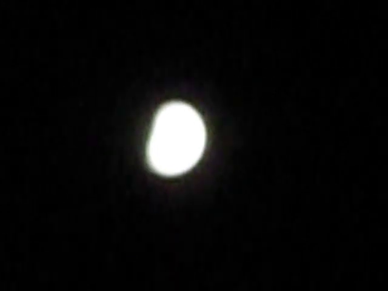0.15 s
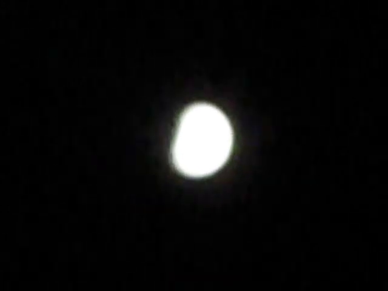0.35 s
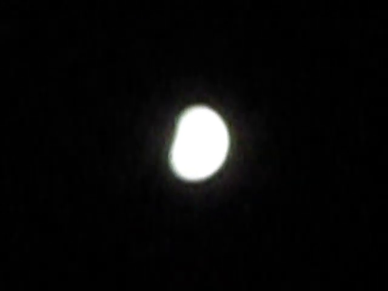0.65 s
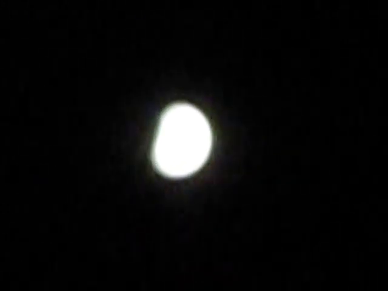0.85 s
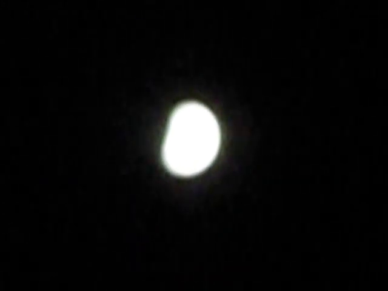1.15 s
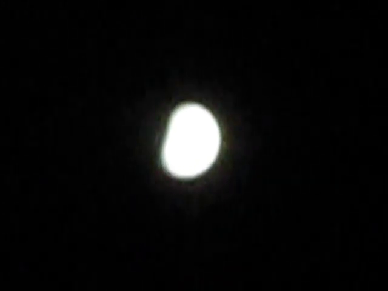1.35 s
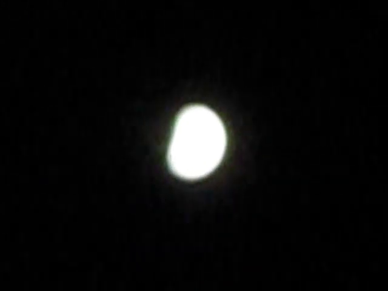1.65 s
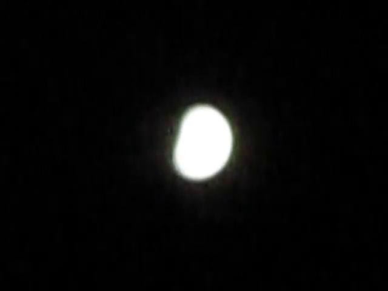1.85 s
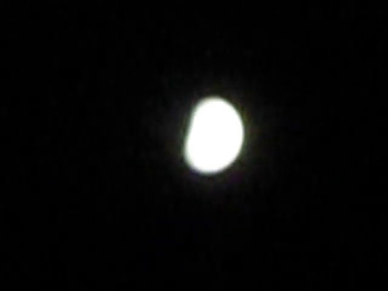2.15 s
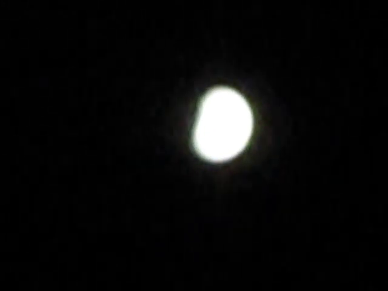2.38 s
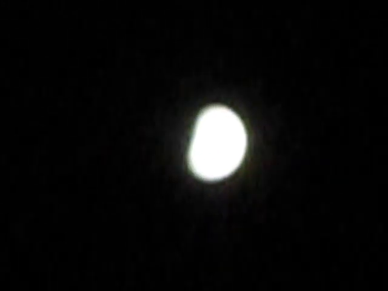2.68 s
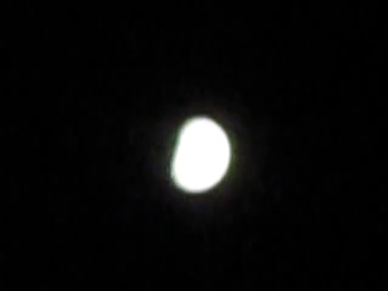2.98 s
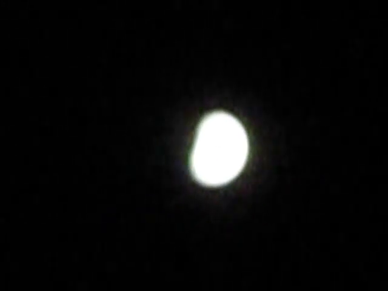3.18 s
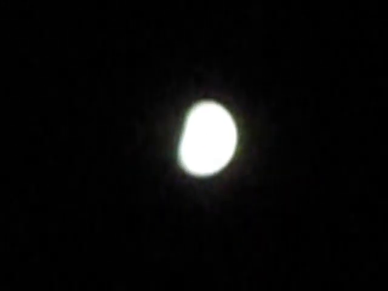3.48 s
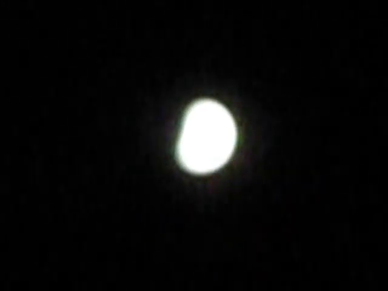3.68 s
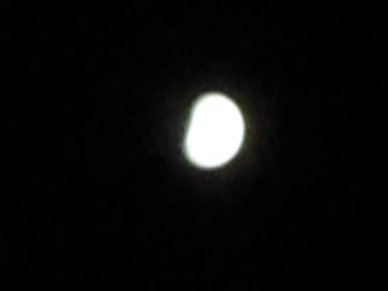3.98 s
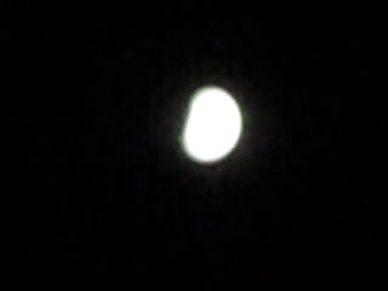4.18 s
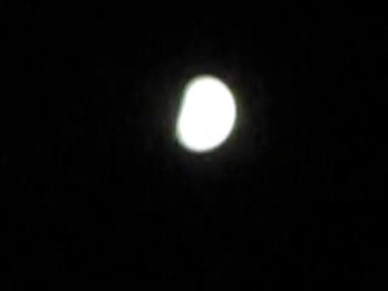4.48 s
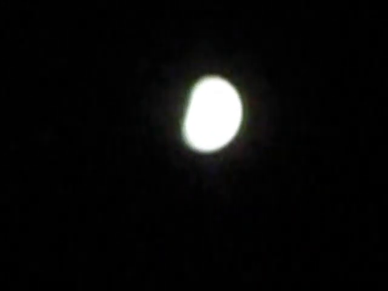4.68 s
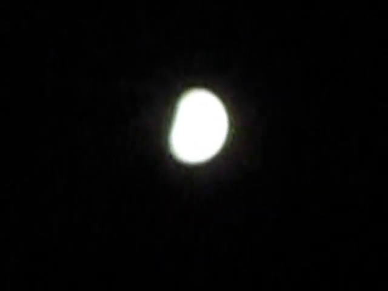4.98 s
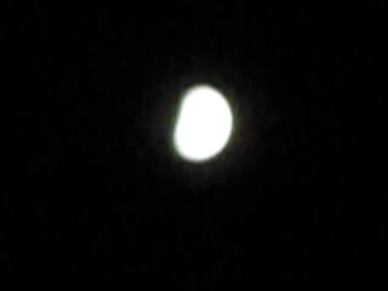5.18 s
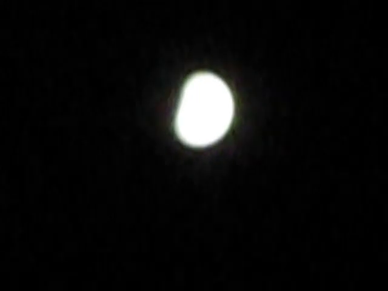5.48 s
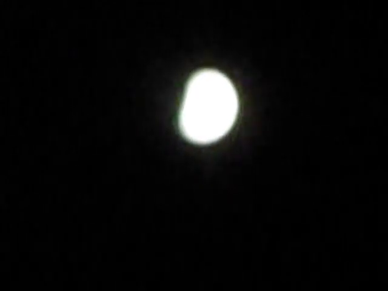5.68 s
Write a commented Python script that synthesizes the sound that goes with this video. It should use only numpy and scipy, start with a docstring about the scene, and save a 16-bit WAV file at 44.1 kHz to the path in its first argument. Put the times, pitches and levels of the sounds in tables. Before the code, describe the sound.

Night outdoors: the tail of one barn owl hiss, then three full, half-second rasping hisses about two seconds apart. Crickets chirp throughout in quick runs over a faint distant trill. Wind is light at first, then rumbles and thumps irregularly on a handheld camera's microphone. One small plastic click falls midway.

```python
"""Owls and crickets on a gusty night

Barn owls hiss about every two seconds: throat noise through resonances that brighten as the push goes on.
Crickets chirp in short runs of falling tones, with echoes, over a steady distant trill.
Gusts buffet the single microphone of a hand-held camera: flickering rumble, eddies and hard thumps.
The case ticks, scuffs and clicks once; traffic, a fading engine drone, hiss and a thin whine lie beneath."""
import sys
import numpy as np
from scipy import signal
from scipy.fft import rfft, irfft
from scipy.io import wavfile

SR = 44100
rng = np.random.default_rng(int(sys.argv[2]) if len(sys.argv) > 2 else 0)


def wrap_up_sound(samples):
    """Save the sound to the file named by the first command line argument, as 16-bit audio."""
    columns = np.atleast_2d(samples).T
    # keep every value between -1 and 1, then stretch to whole-number steps
    tamed = np.clip(columns, -1, 1)
    steps = np.round(tamed * 32767).astype(np.int16)
    wavfile.write(sys.argv[1], SR, steps)


N = 257103
TIME = np.arange(N) / SR
FREQ = np.maximum(np.arange(N // 2 + 1) * SR / N, 1)


def undb(db):
    """Decibels to gain."""
    return 10 ** (np.asarray(db) / 20)


def unit(x):
    """Scale to rms 1."""
    return x / np.sqrt(np.mean(x ** 2))


def colour(points):
    """Gain at every frequency from (Hz, dB) points, straight on a log-frequency axis."""
    hz, db = np.transpose(points)
    return undb(np.interp(np.log(FREQ), np.log(hz), db))


def shape(x, gain):
    """Filter by a gain at every frequency."""
    return irfft(rfft(x) * gain, N)


def noise(gain):
    """Noise of rms 1 with the given spectrum."""
    return unit(shape(rng.standard_normal(N), gain))


def resonance(hz, width_hz):
    """Gain of a resonance applied twice: steep skirts."""
    detune = (FREQ ** 2 - hz ** 2) / (FREQ * width_hz * np.sqrt(2))
    return 1 / (1 + detune ** 2)


def walk(rate_hz):
    """Slow random drift of rms 1."""
    return noise(1 / (1 + (FREQ / rate_hz) ** 4))


def level(points):
    """Level in dB at every moment from (s, dB) points."""
    return np.interp(TIME, *np.transpose(points))


def add(out, start_s, sound):
    """Mix a short sound in at its time."""
    i = max(int(start_s * SR), 0)
    out[i:i + len(sound)] += sound[:N - i]


def scatter(x, t60_s):
    """The fading echo that ground, trees and walls return."""
    t = TIME[:SR // 2]
    after_gap = t > 0.004
    tail = rng.standard_normal(len(t)) * undb(-60 * t / t60_s) * after_gap
    return signal.fftconvolve(x, tail / np.linalg.norm(tail))[:N]


HISS_ATTACK_S, HISS_SWELL_S = 0.017, 0.12
HISS_RELEASE_DB_PER_S, BRIGHTEN_DB_PER_S = 115, 10


def hiss(start_s, length_s, level_db, swell_db, treble_db, throat, rasp_db=-0.06, low_hz=2200,
         edge_hz=4000, closed_db=-30, first_hz=3000, open_s=0.05):
    """Air forced through the throat; as the push goes on it wakes the upper resonances."""
    age = np.maximum(TIME - start_s, 0)
    swell = swell_db * np.exp(-age / HISS_SWELL_S)
    release = HISS_RELEASE_DB_PER_S * np.maximum(age - length_s, 0)
    effort_db = level_db - swell - release
    edge_db = treble_db - BRIGHTEN_DB_PER_S * np.maximum(length_s - age, 0)
    low_cut = 1 / np.sqrt(1 + (low_hz / FREQ) ** 24)
    air = 0
    for hz, width_hz, mode_db in throat:
        # upper resonances take more of the brightening
        share = np.clip(np.log2(hz / edge_hz) + 0.22, 0, 1)
        # the beak opens during the first moments, and the lowest resonance comes in with it
        shut_db = closed_db * max(np.log2(first_hz / hz), 0) * np.exp(-age / open_s)
        mode = noise(resonance(hz, width_hz) * low_cut) * np.sqrt(width_hz / 800)
        air = air + mode * undb(mode_db + share * edge_db + shut_db)
    attack = np.minimum(age / HISS_ATTACK_S, 1)
    return air * attack * undb(effort_db + rasp_db * walk(90))


# Throat and beak resonances, one table per posture.
# Each row: centre in Hz, width in Hz, level in dB at a width of 800 Hz.
THROATS = {
    "A": [(2380, 370, -3.5), (2840, 450, -1), (3300, 420, -5.5), (3730, 370, -1.5), (4040, 260, -23),
          (4830, 500, -5.5), (6300, 700, -10.5), (7200, 1500, -5), (9200, 1600, -12)],
    "B": [(2404, 380, 0), (2886, 350, 0.5), (3280, 180, -17), (3560, 400, -2.5), (3970, 390, -4.5),
          (4830, 310, -6), (6770, 1400, -9.5), (7400, 1200, -9.5), (9750, 1400, -19)],
    "C": [(2370, 380, -1), (2940, 280, 1.5), (3340, 280, -15), (3640, 290, 1), (4010, 370, -2),
          (4800, 820, -14), (6400, 940, -11), (7150, 1000, -5), (9500, 2000, -19.5)],
}
# Owl hisses. Each row: start in seconds, length of the push in seconds, level at full effort in dB,
# swell in dB, treble at the end of the push in dB, throat posture (a letter).
OWL_HISSES = [(-0.48, 0.49, -43.5, 10, -0.5, "B"), (0.945, 0.51, -40, 9, -6.5, "A"),
              (2.895, 0.52, -43, 9.5, 1, "B"), (4.65, 0.52, -43.5, 10.5, -1.5, "C")]


def owls(echo_db=-12):
    """The end of one hiss and three whole ones, with the echo of their surroundings."""
    calls = sum(hiss(*row, THROATS[posture]) for *row, posture in OWL_HISSES)
    return calls + undb(echo_db) * scatter(calls, t60_s=0.23)


# Night air and microphone hiss. Each row: frequency in Hz, relative density in dB per Hz.
NIGHT_COLOUR = [(20, 3.5), (100, 0.5), (250, -3.5), (480, -2.5), (800, 2.5), (1100, -2), (1700, -9.5),
                (3300, -12), (5000, -14.5), (7000, -18), (9500, -19), (12500, -21), (15500, -28.5)]
# Fading far engine. Each row: time in seconds, level in dB.
DRONE_LEVEL = [(0, -55), (.7, -55.5), (1.0, -72), (1.5, -90)]
# Its resonances. Each row: centre in Hz, width in Hz, relative gain in dB.
DRONE_RESONANCES = [(220, 38, -2), (270, 40, -5), (424, 20, 0)]
WHINE_HZ = 15734


def background(air_db=-47.5, whine_db=-83):
    """Far traffic, a fading engine drone, microphone hiss and the camera's thin electronic whine."""
    air = noise(colour(NIGHT_COLOUR)) * undb(air_db + 0.38 * walk(7.3))
    bands = sum(undb(db) * resonance(hz, width_hz) for hz, width_hz, db in DRONE_RESONANCES)
    drone = noise(bands) * undb(level(DRONE_LEVEL))
    whine = np.sqrt(2) * np.sin(2 * np.pi * WHINE_HZ * TIME)
    return air + drone + undb(whine_db) * whine


def eddy(centre_s, db, hz, cycles):
    """One eddy briefly pushes the diaphragm to and fro; gives its start and its sound."""
    t = np.arange(-SR // 25, SR // 25) / SR
    push = np.cos(2 * np.pi * (hz * t + rng.random())) / np.cosh(t * hz / cycles)
    return centre_s + t[0], undb(db) * push


# Low rumble. Each row: time in seconds, level in dB before the flutter.
RUMBLE_LEVEL = [(0.0, -49), (0.1, -61.5), (1.23, -57.5), (1.38, -75), (1.59, -42.5), (2.6, -50.5),
                (2.74, -36), (2.79, -53), (3.99, -41.5), (4.12, -54), (4.61, -45), (5.21, -53),
                (5.29, -43.5), (5.83, -51)]
# Its spectrum. Each row: frequency in Hz, relative gain in dB.
RUMBLE_COLOUR = [(6, -37), (20, -12), (32, 0), (55, 1.5), (110, -1), (180, -17), (280, -16), (420, -25.5),
                 (800, -32), (2000, -95)]
# Hardest eddies, heard as single thumps.
# Each row: centre in seconds, envelope peak in dB before thump_trim_db and the capsule leak, pitch in Hz.
THUMPS = [(1.625, -20.5, 200), (1.782, -16, 190), (1.853, -20, 260), (1.933, -17.5, 195), (1.996, -19, 274),
          (2.104, -17.5, 165), (2.175, -15.5, 176), (2.709, -13, 110), (2.724, -13, 183),
          (3.445, -17.5, 230), (3.943, -17, 225), (4.011, -12, 148), (5.327, -18, 173), (5.348, -17.5, 200),
          (5.42, -22, 201), (5.539, -17, 145)]
# Gusts, each a string of random eddies.
# Each row: start in seconds, length in seconds, mean eddy peak in dB before the capsule leak.
GUST_EDDIES = [(1.516, 0.1, -25.5), (1.73, 0.31, -28), (2.12, 0.09, -25.5), (2.335, 0.04, -28.5),
               (2.461, 0.09, -35.5), (2.681, 0.07, -23.5), (2.945, 0.025, -30), (3.144, 0.07, -32),
               (3.295, 0.025, -31.5), (3.413, 0.025, -23), (3.509, 0.025, -29.5), (3.575, 0.14, -25),
               (3.865, 0.12, -29.5), (4.31, 0.025, -30), (4.498, 0.025, -28), (4.618, 0.09, -29.5),
               (5.08, 0.05, -32.5), (5.315, 0.115, -23), (5.535, 0.035, -29)]
EDDIES_PER_S, EDDY_HZ, EDDY_SCATTER_DB, EDDY_SCATTER_OCTAVES = 65, 125, 2, 0.42


def wind(thump_trim_db=-1.5, flutter_db=4.0, thump_cycles=0.31, eddy_cycles=0.37,
         jitter=0.3, leak_hz=40, swirl_db=-18, swirl_hz=230, swirl_width_hz=130):
    """A fluttering rumble, gusts that break into eddies, and a few hard thumps."""
    rumble = noise(colour(RUMBLE_COLOUR)) * undb(level(RUMBLE_LEVEL) + flutter_db * walk(30))
    eddies = np.zeros(N)
    for centre_s, db, hz in THUMPS:
        add(eddies, *eddy(centre_s, db + thump_trim_db, hz, thump_cycles))
    for start_s, length_s, db in GUST_EDDIES:
        for slot_s in np.arange(start_s, start_s + length_s, 1 / EDDIES_PER_S):
            late, force, size = rng.standard_normal(3)
            centre_s = slot_s + jitter * late / EDDIES_PER_S
            hz = EDDY_HZ * 2 ** (EDDY_SCATTER_OCTAVES * size)
            add(eddies, *eddy(centre_s, db + EDDY_SCATTER_DB * force, hz, eddy_cycles))
    # each eddy sheds smaller, faster swirls
    swirls = undb(swirl_db) * eddies * noise(resonance(swirl_hz, swirl_width_hz))
    # the capsule leaks, so it cannot hold a steady push
    return rumble + shape(eddies + swirls, FREQ / (FREQ + leak_hz))


def wing_stroke(hz, length_s, fall_hz=350, bend=2.8, swell=2.55):
    """A tone that swells while its pitch falls, as the scraper slows along the file."""
    t = TIME[:int(length_s * SR)]
    pitch_hz = hz - fall_hz * (t / 0.0191) ** bend  # down by fall_hz at 19.1 ms
    envelope = np.sqrt(np.sin(np.pi * (t / length_s) ** swell).clip(0))
    return envelope * np.sin(2 * np.pi * np.cumsum(pitch_hz) / SR), pitch_hz


GAP_GROWTH_S = 0.005
# shortfall of the first stroke: level, share of pitch, share of length; then the share left at each next one
COLD_DB, COLD_FLAT, COLD_SHORT, COLD_LEFT = -3, 0.031, 0.25, 0.45


def chirp(closure_s, db, hz, gap_s, length_s, count):
    """Strokes as (s, dB, Hz, length s): they slow down and grow louder, higher and longer."""
    for k in range(count):
        cold = COLD_LEFT ** k
        lasts_s = length_s * (1 - COLD_SHORT * cold)
        yield closure_s - lasts_s, db + COLD_DB * cold, hz * (1 - COLD_FLAT * cold), lasts_s
        closure_s = closure_s + gap_s + k * GAP_GROWTH_S


# Cricket chirps. Each row: first wing closure in seconds, strokes (count), level in dB before trim_db,
# starting pitch in Hz and (sixth) stroke length in seconds that the strokes approach,
# with the first gap between closures in seconds fifth; last, echo in dB before echo_db.
CRICKET_CHIRPS = [(0.253, 4, -37, 4300, 0.043, 0.024, -5.5), (0.446, 3, -46.5, 4340, 0.044, 0.018, -8),
                  (0.712, 5, -38, 4253, 0.0445, 0.024, 0), (1.308, 4, -40.5, 4240, 0.042, 0.028, 7),
                  (1.509, 4, -40, 4130, 0.036, 0.019, 1), (1.739, 4, -41.5, 4240, 0.042, 0.026, 4.5),
                  (2.068, 3, -45, 4380, 0.041, 0.02, -10), (2.218, 4, -42, 4300, 0.044, 0.026, 3.5),
                  (2.682, 5, -42, 3890, 0.045, 0.013, -6), (2.751, 4, -41.5, 4300, 0.043, 0.025, 4),
                  (3.202, 4, -42, 4320, 0.043, 0.026, 4), (3.491, 3, -46.5, 4380, 0.038, 0.021, -5),
                  (3.644, 4, -39.5, 4270, 0.046, 0.026, 1.5), (4.103, 5, -42, 3870, 0.042, 0.012, -6),
                  (4.221, 3, -47, 4370, 0.04, 0.024, -8), (4.512, 4, -41, 4310, 0.045, 0.026, 2.5),
                  (5.028, 3, -35.5, 4255, 0.049, 0.022, 0), (5.425, 4, -40.5, 4334, 0.044, 0.027, 4),
                  (5.479, 4, -39.5, 3880, 0.047, 0.013, -6), (5.62, 3, -49, 4370, 0.039, 0.022, -7)]


def crickets(trim_db=-1, echo_db=1, echo_hz=4210, echo_width_hz=130, chorus_db=-62, uneven_db=0.2):
    """Near crickets chirp by chirp, their echoes, and the steady trill of distant ones."""
    near, outward = np.zeros(N), np.zeros(N)
    for first_s, count, chirp_db, chirp_hz, gap_s, stroke_s, share_db in CRICKET_CHIRPS:
        for start_s, db, hz, length_s in chirp(first_s, chirp_db, chirp_hz, gap_s, stroke_s, count):
            stroke, pitch_hz = wing_stroke(hz, length_s)
            near_db = db + trim_db + uneven_db * rng.standard_normal()
            add(near, start_s, undb(near_db) * stroke)
            # the surroundings return mostly the pitches near echo_hz
            returned = stroke / (1 + ((pitch_hz - echo_hz) / echo_width_hz) ** 2)
            add(outward, start_s, undb(db + share_db + echo_db) * returned)
    chorus = noise(resonance(3970, 370)) * undb(chorus_db + 2 * walk(25))
    return near + scatter(outward, t60_s=0.42) + chorus


# Ticks and scuffs of the case. Each row: start in seconds, level in dB before tick_trim_db and filtering,
# decay time constant in seconds, lower edge in Hz.
CASE_TICKS = [(2.3062, -38, 0.00053, 8000), (2.3173, -43, .0006, 4000), (2.3337, -36.5, .0006, 3500),
              (2.3663, -41, 0.00082, 3500), (2.3734, -43.5, 0.00068, 1500), (2.378, -42, 0.00055, 1500),
              (3.468, -44, .002, 13000), (3.488, -51, .006, 13000), (3.567, -48, 0.0076, 12000),
              (3.966, -45, 0.00069, 8000), (4.689, -44, 0.0018, 9000)]
# Their spectrum. Each row: frequency in Hz, gain in dB.
CASE_TICK_COLOUR = [(1500, -24), (3500, 5), (5200, 11.5), (7500, -1), (11500, 2), (15500, -8)]
# Case modes in the click. Each row: frequency in Hz, level in dB relative to CLICK_DB, t60 in seconds.
CASE_MODES = [(1453, 5.5, .014), (1200, -15, 0.0082), (1740, -5, 0.0088), (2100, -10, 0.014),
              (2880, -20, 0.008)]
CLICK_S, CLICK_DB = 2.3782, -15.5


def camera_case(tick_trim_db=5, contact_s=0.00026, low_hz=900):
    """Plastic under the hand: tiny bright ticks and one click that rings the case."""
    t = TIME[:SR // 20]
    ticks = np.zeros(N)
    for start_s, db, decay_s, edge_hz in CASE_TICKS:
        scuff = rng.standard_normal(len(t)) * np.exp(-t / decay_s)
        bright = signal.lfilter(*signal.butter(2, edge_hz, "high", fs=SR), scuff)
        add(ticks, start_s, undb(db + tick_trim_db) * bright)
    out = shape(ticks, colour(CASE_TICK_COLOUR))
    ring = 0
    for hz, db, t60_s in CASE_MODES:
        ring = ring + undb(db) * np.exp(-np.log(1000) * t / t60_s) * np.sin(2 * np.pi * hz * t)
    ring = ring * (1 - np.exp(-t / contact_s))
    # so small a shell radiates no bass
    ring = signal.lfilter(*signal.butter(4, low_hz, "high", fs=SR), ring)
    add(out, CLICK_S, undb(CLICK_DB) * ring)
    return out


def scene():
    """One microphone feeds both channels."""
    mono = owls() + background() + wind() + crickets() + camera_case()
    return np.array([mono, mono])


NOTCH_HZ, NOTCH_Q, TOP_HZ = 7860, 4.76, 15850


def record(dry):
    """The camera has a deep notch near 8 kHz and cuts the top."""
    notched = signal.lfilter(*signal.iirnotch(NOTCH_HZ, NOTCH_Q, fs=SR), dry)
    top_cut = signal.ellip(12, 0.2, 70, TOP_HZ, fs=SR, output="sos")
    return signal.sosfilt(top_cut, notched)


dry = scene()
out = record(dry)
wrap_up_sound(out)
```